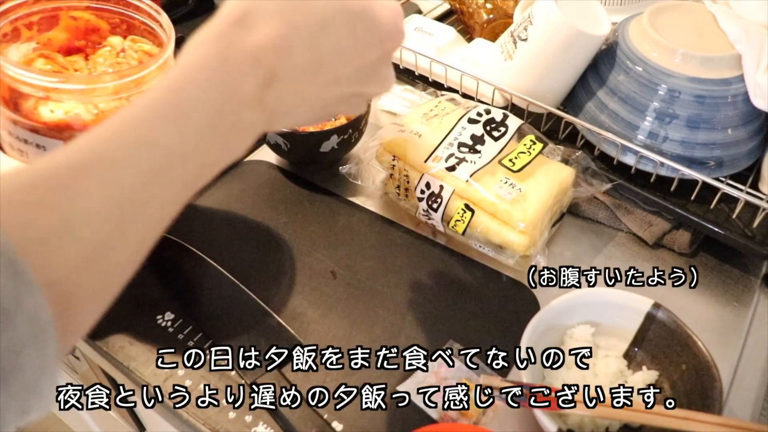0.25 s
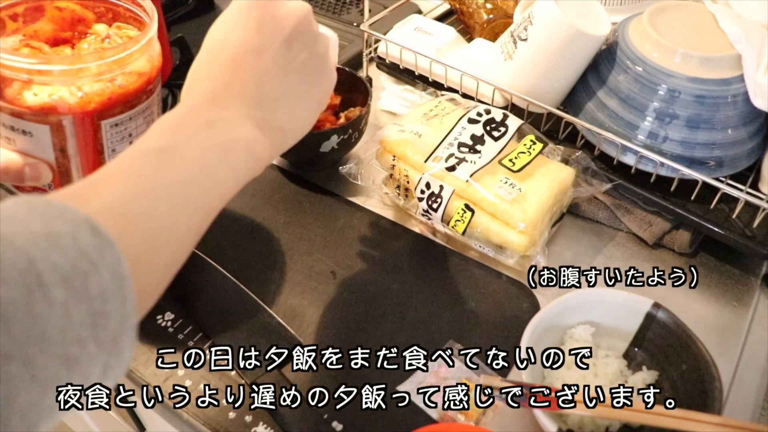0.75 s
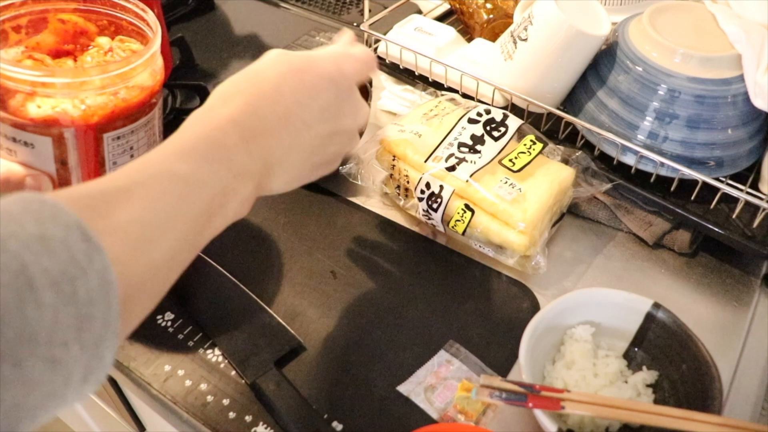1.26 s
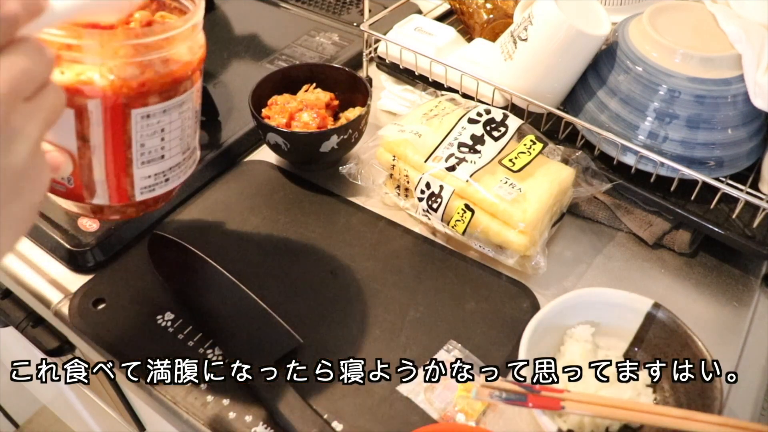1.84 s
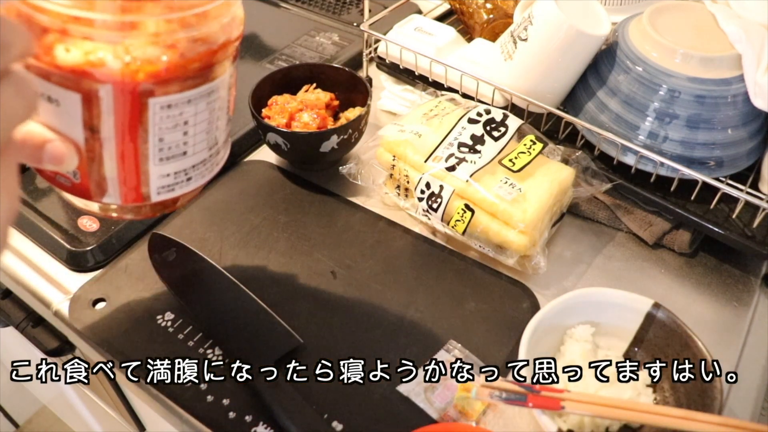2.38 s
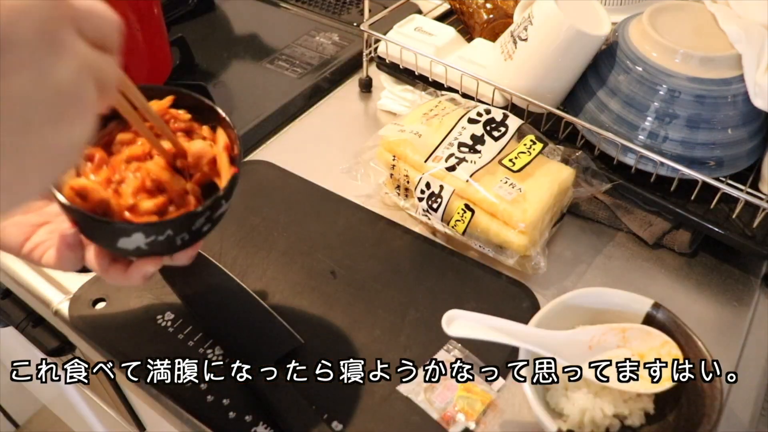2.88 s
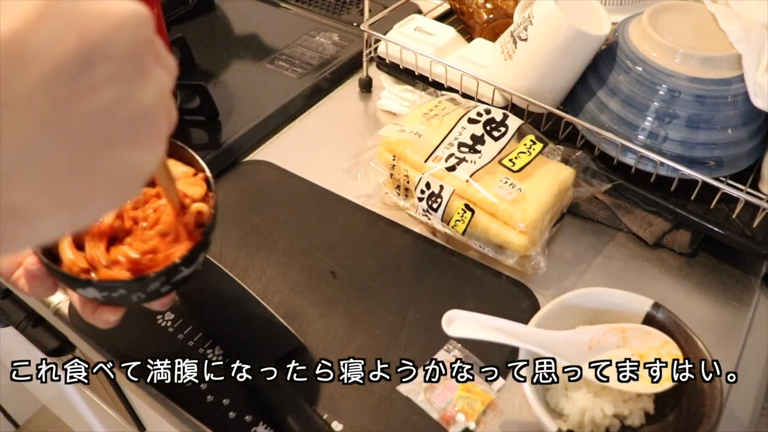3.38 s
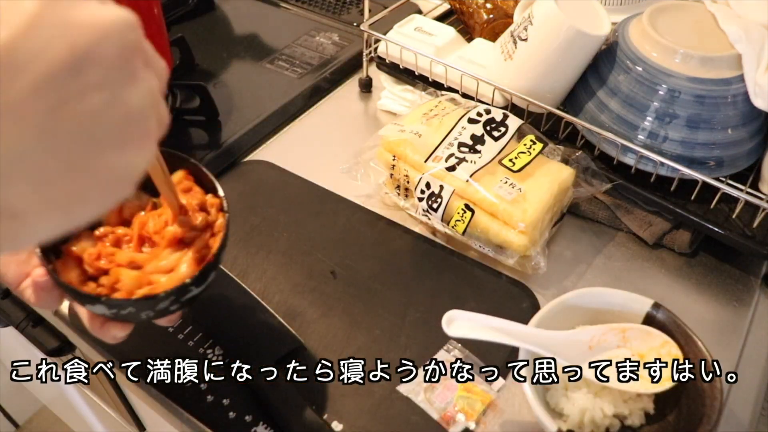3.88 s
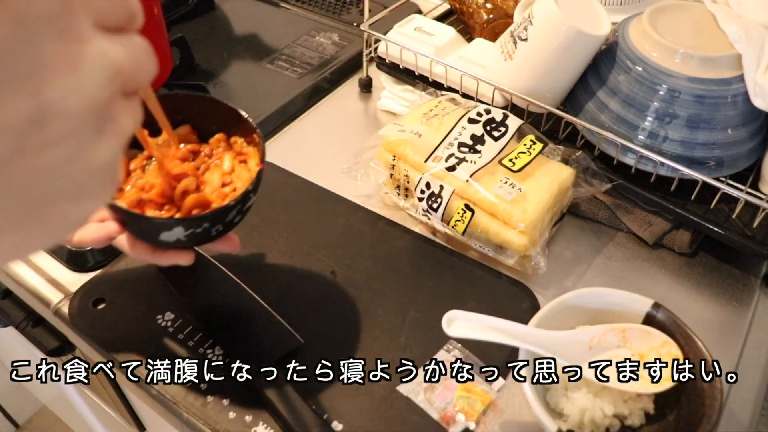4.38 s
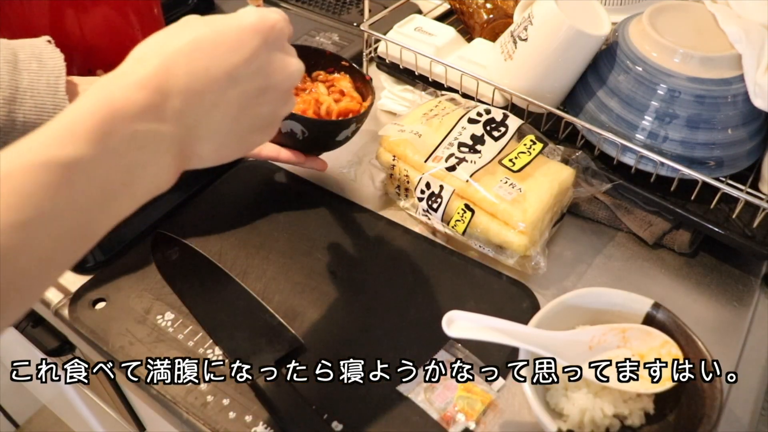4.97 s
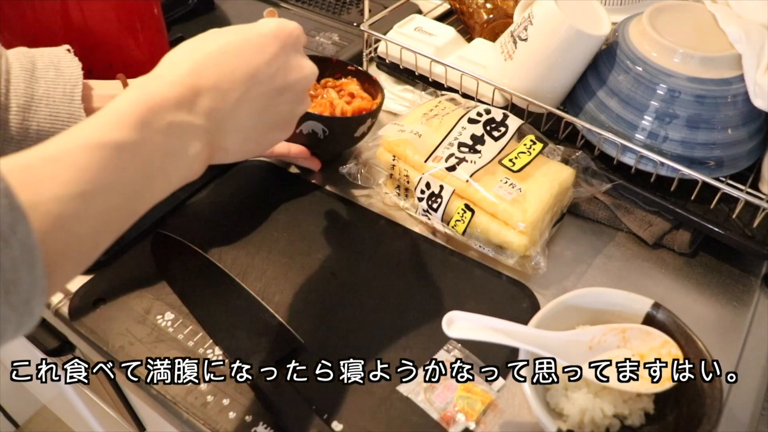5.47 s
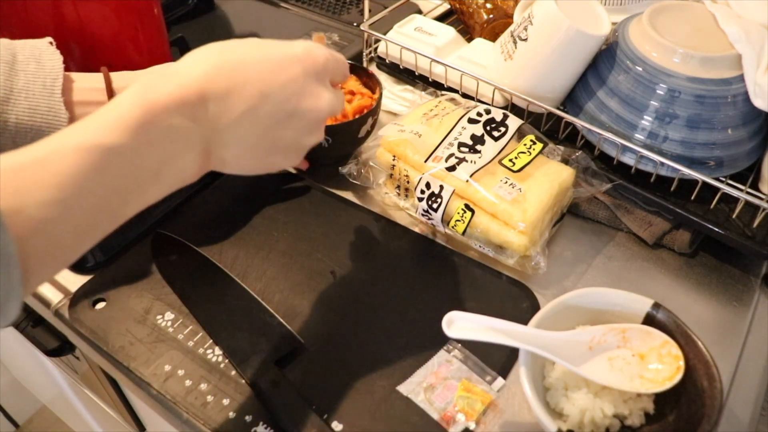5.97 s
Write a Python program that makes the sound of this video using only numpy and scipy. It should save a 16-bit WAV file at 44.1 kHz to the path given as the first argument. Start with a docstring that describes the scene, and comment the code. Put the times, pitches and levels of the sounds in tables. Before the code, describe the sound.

In a quiet kitchen, heard up close, faint chopstick ticks lead to four quick, hollow raps on the rim of a plastic jar. The chopsticks then scrape and click around a small bowl, with the crackle of wet food. As the stirring softens, something heavy slides, knocks loudly against a cabinet and bounces once. A refrigerator hums faintly underneath.

```python
"""A quiet kitchen, heard up close. Chopsticks rap four times on the rim of a plastic jar, each rap a
crack over a short hollow ring. They scrape and tick round a small bowl: stick-slip grit, a ringing
wall and the crackle of wet food. Something heavy slides, knocks home and bounces once, sounding
the cabinet. Underneath, a refrigerator hums in room rumble and microphone hiss."""
import sys
import numpy as np
from scipy import signal
from scipy.fft import rfft, irfft, next_fast_len
from scipy.io import wavfile
from scipy.ndimage import uniform_filter1d

SR = 44100
rng = np.random.default_rng(int(sys.argv[2]) if len(sys.argv) > 2 else 0)


def to_wav(s):
    """Save 16-bit WAV."""
    ch = np.atleast_2d(s).T  # columns
    pcm = np.round(np.clip(ch, -1, 1) * 32767)  # PCM
    wavfile.write(sys.argv[1], SR, pcm.astype(np.int16))


N = 274743

# Raps on the jar: start_s, level_db, hardness (0-1), pan_db (left minus right)
JAR_RAPS = [(1.885, -20.5, 0.87, -1.5), (2.0385, -19, 0.85, 0.5), (2.1763, -20.5, 0.65, 0),
            (2.315, -28.5, 0.46, 0)]
# The jar's hollow ring: pitch_hz, level_db, t60_s
JAR_MODES = [(218, -7.5, 0.086), (250, -2.5, 0.083), (319, -11, 0.042), (906, -2.5, 0.016),
             (1130, -16, 0.029), (1216, -7, 0.09), (1420, -28, 0.051), (1592, -16, 0.053),
             (1740, -33, 0.02), (2040, -13, 0.074), (2190, -11, 0.019), (2280, -3, 0.022), (3490, 1, 0.015)]
# Colour of the crack of wood on plastic: freq_hz, level_db
JAR_CRACK_EQ = [(100, -48), (160, -33), (225, -7.5), (300, -4), (430, -20), (750, -9.5), (1200, -4.5),
                (2100, -4.5), (2800, -8), (5000, -10), (9000, -13.5), (16000, -23.5)]
# Knocks of the heavy thing: start_s, level_db, hardness (0-1), pan_db (left minus right)
HEAVY_KNOCKS = [(5.393, -14, 0.9, 0), (5.3948, -4, 0.88, 1), (5.413, -21, 0.4, -1), (5.441, -46, 0.3, 0),
                (5.66, -14.5, 1, 1), (5.75, -35.5, 0.8, 2), (5.143, -44, 0, 2.5), (5.995, -40.5, 0.1, -0.5)]
# The cabinet's ring: pitch_hz, level_db, t60_s
CABINET_MODES = [(115.6, -1.5, 0.27), (214.4, -2, 0.29), (282, 0.5, 0.14), (326.7, -15, 0.23),
                 (393.2, -7.5, 0.18), (470, -14, 0.47), (492, -13.5, 0.042), (564, -12, 0.36),
                 (680, 9.5, 0.029), (728, -4, 0.13), (815, -12.5, 0.077), (848, 4.5, 0.097), (969, -6, 0.1),
                 (1077, -1, 0.084), (1305, -7, 0.041), (2754, -10, 0.054)]
# Colour of a knock's crack: freq_hz, level_db
CABINET_CRACK_EQ = [(88, -46.5), (150, -6), (291, 1), (534, -1.5), (689, -0.5), (1760, -10.5), (1900, -11),
                    (2810, -16), (3040, -16.5), (16000, -48)]
# Fader curve of the heavy thing rolling home: time_s, level_db
SLIDE_FADER = [(5.143, -53), (5.2, -84), (5.25, -51), (5.31, -50), (5.36, -59), (5.392, -73)]
# Chopstick ticks on bowl and food: start_s, level_db, pitch_hz, puff_t60_s
TIP_TICKS = [(0.044, -51, 3000, 0.026), (0.068, -45.5, 7800, .04), (0.711, -36.5, 13000, 0.012),
             (.7685, -45, 8200, 0.028), (.769, -41.5, 4600, 0.05), (0.774, -42, 4970, 0.076),
             (.829, -44.5, 9800, 0.047), (0.844, -45, 12000, 0.05), (1.043, -54, 6000, .03),
             (1.263, -52, 5500, .03), (1.412, -53, 6000, .02), (2.69, -48.5, 4000, .04),
             (2.779, -42.5, 680, 0.023), (2.811, -32, 4330, 0.065), (2.817, -40, 1640, 0.12),
             (2.972, -28, 1030, 0.039), (3.174, -40, 2660, 0.24), (3.238, -42.5, 2720, 0.11),
             (3.254, -37.5, 910, 0.11), (3.295, -31.5, 3020, 0.027), (3.366, -48, 4300, .03),
             (3.489, -31.5, 1030, 0.027), (3.496, -37, 5440, 0.14), (3.585, -37, 880, 0.027),
             (3.61, -37.5, 925, 0.13), (3.71, -39, 4100, 0.069), (3.7285, -26.5, 2500, 0.022),
             (3.734, -36, 1640, 0.065), (3.738, -34, 4500, 0.018), (3.84, -41, 9000, 0.01),
             (3.866, -39.5, 3040, 0.04), (3.883, -38.5, 3160, 0.08), (3.966, -45, 1130, 0.054),
             (4.609, -48.5, 3350, 0.091), (4.709, -36.5, 1050, 0.072), (4.712, -51, 2550, 0.24),
             (4.794, -44, 665, 0.043), (4.853, -46.5, 2660, 0.068), (5.997, -50, 5630, 0.27),
             (5.996, -48.5, 2430, 0.23)]
# Scraping strokes: start_s, rise_s, fall_s, hiss_db, ring_db, drag_db (last two relative to hiss_db)
SCRAPE_STROKES = [(0.04, 0.024, 0.018, -61, -10, -24), (0.8, .05, 0.027, -66, -20, -8),
                  (1.62, 0.053, 0.1, -61, -12, -19), (2.495, 0.014, 0.14, -65, -5, -29),
                  (2.7, .018, .022, -69, -16, -14), (2.77, 0.025, .02, -59.5, -4, -14),
                  (2.807, 0.016, 0.036, -46, -14, -20), (2.83, 0.072, 0.064, -45, -6, -16),
                  (2.971, 0.0035, 0.18, -47.5, -7.5, -13.5), (3.08, 0.066, 0.1, -46.5, -5.5, -8),
                  (3.23, 0.051, 0.057, -46, -1.5, -16), (3.35, 0.11, 0.03, -50, -8, -18),
                  (3.486, 0.012, 0.049, -45.5, -5.5, -11), (3.582, 0.0043, 0.04, -50.5, -2.5, -5.5),
                  (3.59, 0.032, 0.082, -47, -4, -18), (3.66, 0.026, 0.034, -50.5, -9, -26),
                  (3.73, 0.024, 0.018, -49.5, -5, -25), (3.83, 0.017, 0.067, -61.5, -2.5, -0.5),
                  (3.88, 0.011, 0.09, -53.5, -1.5, -11.5), (3.962, 0.01, 0.025, -51.5, -2, -7),
                  (4.05, 0.23, 0.052, -62, -1, -26), (4.28, 0.073, 0.095, -68.5, -4, -31),
                  (4.45, 0.19, .05, -63.5, -5, -15.5), (4.64, 0.044, 0.028, -58, -16, -26.5),
                  (4.71, 0.054, 0.086, -57, -6.5, -26), (4.81, .055, .06, -59.5, -4.5, -11),
                  (4.89, .055, 0.082, -63, -10, -13), (4.98, .06, 0.17, -68, -0.5, -5),
                  (5.134, 0.13, .12, -57, -2.5, 5.5), (5.25, 0.15, .05, -56, -17, -18.5),
                  (5.341, .3, 0.032, -57.5, -4.5, 2), (5.994, 0.029, 0.21, -64.5, -2, 1)]
# Bright hiss of the tips: freq_hz, level_db
TIP_HISS_EQ = [(3000, -43), (4500, -7.5), (6500, -0.5), (9000, 0), (12500, -1), (15000, -5.5), (16000, -9)]
# Resonances of the bowl wall: pitch_hz, width_hz, level_db
BOWL_MODES = [(1480, 83, 8), (1870, 67, 1), (2610, 280, 24), (3850, 590, 24.5), (5140, 280, 22.5)]
# Dull body of a scrape or slide: freq_hz, level_db
DRAG_EQ = [(120, -33.5), (200, -9), (560, -6.5), (800, -7.5), (1000, -2.5), (1350, -2), (1600, -6),
           (2000, -6), (2300, -16.5), (4000, -50.5)]
# The kitchen's decay: freq_hz, t60_s
ROOM_DECAY = [(100, 0.89), (300, 0.77), (1000, 0.41), (3000, 0.34), (9000, 0.27)]
# Refrigerator tones: pitch_hz, width_hz, level_db
FRIDGE_TONES = [(72.3, 11, -65), (117.3, 12, -66), (215, 18, -80), (329.4, 34, -79), (1199, 60, -78.5)]
# Room rumble and microphone hiss: freq_hz, level_db
ROOM_TONE_EQ = [(15, -40), (25, -29.5), (40, -2.5), (52, -17), (70, -8), (120, -2), (151, -18.5),
                (211, -11), (321, -16), (490, -21.5), (1000, -28.5), (1630, -30.5), (4360, -32),
                (15000, -32), (16300, -48.5)]
# Stereo image of the near sounds and their reverb: freq_hz, likeness (0 wide, 1 centred)
NEAR_IMAGE = [(60, 0.51), (400, 1), (950, 0.93), (2400, 0.34), (6000, 0.078), (15000, 0.11)]
# Stereo image of the background: freq_hz, likeness (0 wide, 1 centred)
BED_IMAGE = [(30, 1), (180, 0.99), (550, 0.88), (1650, 0.44), (5000, 0.093), (15000, .1)]
# Imbalance of the microphone ports: freq_hz, pan_db (left minus right)
PORT_BALANCE = [(60, 1), (600, 0.6), (1500, 0.5), (15000, 0.8)]

TICK_SPREAD, TICK_PAN_DB = 2.6, 1.5  # more spread gives a drier, less pitched tick
HISS_POWER, DRAG_POWER = 1.01, 0.8  # how steeply hiss and drag follow the speed of the tips
SIZZLE_HZ = 12870  # the bright top of a fast stroke
CRACKLES_PER_S, CRACKLE_DB, CRACKLE_SPREAD_DB, CRACKLE_T60_S = 180, -4, 4.5, 0.0068
ROOM_TONE_DB, HIGH_CUT_HZ = -60.5, 15850
RIGHT_LAG_SAMPLES = 4  # the sources stand a little to the left


def jar_raps():
    """Both chopsticks land on the rim, the second a softer flam a few ms after the first."""
    flams = [(s + .0065, db - 6, hardness, pan_db) for s, db, hardness, pan_db in JAR_RAPS]
    return blows(list(JAR_RAPS) + flams, JAR_MODES, JAR_CRACK_EQ,
                 crack_db=-0.5, crack_t60_s=0.058, contact_s=0.000064, room_db=-19.5, linger=1.0)


def heavy_knocks():
    """The heavy thing jolts, knocks home, rattles and bounces, ringing the cabinet."""
    return blows(HEAVY_KNOCKS, CABINET_MODES, CABINET_CRACK_EQ,
                 crack_db=-5.5, crack_t60_s=0.085, contact_s=0.00027, room_db=-16.0, linger=2.2)


def blows(cues, modes, crack_eq, crack_db, crack_t60_s, contact_s, room_db, linger):
    """Each blow layers ring, crack and room tail; a harder one speaks faster and cracks more."""
    out, t = np.zeros((2, N)), np.arange(SR // 2) / SR
    for start_s, level_db, hardness, pan_db in cues:
        spot_db = 2.46 * rng.standard_normal(len(modes))  # each blow lands a little elsewhere
        ring = sum((-1) ** k * gain_of(db + spot_db[k] - 60 * t / t60) * np.sin(2 * np.pi * hz * t)
                   for k, (hz, db, t60) in enumerate(modes))
        ring *= 1 - np.exp(-t * np.clip(hardness, .05, 2) / contact_s)
        ring /= abs(ring).max()
        crack = noise(len(t), lambda hz: eq(crack_eq, hz))
        crack *= gain_of(crack_db - 60 * t / crack_t60_s) * (1 - np.exp(-t / 0.00051))
        # the tail has the crack's colour, with the body's modes lingering in it
        wash = noise(len(t), lambda hz: eq(crack_eq, hz) * (1 + linger * hollow(hz, modes, width_hz=10)))
        blow = placed(ring, pan_db) + hardness * crack + gain_of(room_db) * room_tail(wash)
        add(out, start_s, gain_of(level_db) * blow)
    return out


def heavy_slide():
    """The heavy thing slides with a dull rasp that sets the cabinet's modes humming."""
    time_s, level_db = np.transpose(SLIDE_FADER)
    t = np.arange(time_s[0], time_s[-1], 1 / SR)
    rasp = noise(len(t), lambda hz: eq(DRAG_EQ, hz) * (1 + hollow(hz, CABINET_MODES, width_hz=40)))
    fader = gain_of(np.interp(t, time_s, level_db)) * signal.windows.tukey(len(t), .03)
    out = np.zeros((2, N))
    add(out, time_s[0], rasp * fader)
    return out


def chopstick_ticks():
    """A wooden tip touches down: one sharp click and a short puff round the same pitch."""
    out, t = np.zeros((2, N)), np.arange(8192) / SR
    for start_s, level_db, pitch_hz, t60_s in TIP_TICKS:
        width_hz = TICK_SPREAD * pitch_hz / np.sqrt(pitch_hz * t60_s)
        click = np.sin(2 * np.pi * pitch_hz * t) * np.exp(-np.pi * width_hz * t)
        puff = noise(len(t), lambda hz: peak(hz, pitch_hz, width_hz) ** 1.45 + 0.03)
        puff *= gain_of(-9.5 - 60 * t / t60_s) * (1 - np.exp(-t / 0.0008))
        add(out, start_s, gain_of(level_db) * (placed(click, pan_db=0) + puff) * pan(TICK_PAN_DB))
    return out


def bowl_scrapes():
    """Stick-slip grit roughens three layers: hissing tips, ringing bowl wall and dull drag."""
    hiss_level, ring_level, drag_level = stroke_levels()
    grit = unit_rms(gain_of(0.84 * unit_rms(uniform_filter1d(rng.standard_normal(N), size=60))))
    hiss = friction(lambda hz: eq(TIP_HISS_EQ, hz), depth_db=0.5)
    sizzle = friction(lambda hz: peak(hz, SIZZLE_HZ, 5600) ** 2, depth_db=3)
    ring = friction(lambda hz: sum(gain_of(db) * peak(hz, f, w) for f, w, db in BOWL_MODES), depth_db=4.5)
    drag = friction(lambda hz: eq(DRAG_EQ, hz), depth_db=6.5)
    # sizzle and crackle grow faster than the hiss, so hard strokes are brighter and wetter
    bite = (hiss_level / gain_of(-42.5)) ** 0.89
    tips = hiss + bite * (food_crackle() + sizzle)
    return grit * (hiss_level * tips + ring_level * ring + drag_level * drag)


def stroke_levels():
    """Hiss, ring and drag envelopes: strokes speed up and slow on quarter sines and add in power."""
    power = np.zeros((3, N))
    for start_s, rise_s, fall_s, hiss_db, ring_db, drag_db in SCRAPE_STROKES:
        t = np.arange(0, rise_s + fall_s, 1 / SR)
        quarter_turns = np.where(t < rise_s, t / rise_s, 1 + (t - rise_s) / fall_s)
        speed = abs(np.sin(np.pi / 2 * quarter_turns))
        shapes = np.array([speed ** HISS_POWER, speed ** HISS_POWER, speed ** DRAG_POWER])
        gains = gain_of([[hiss_db], [hiss_db + ring_db], [hiss_db + drag_db]])
        add(power, start_s, (shapes * gains) ** 2)
    return np.sqrt(power)


def friction(colour, depth_db):
    """Rubbing noise whose bands flicker in patches of some 40 ms as the point of contact wanders."""
    bands = signal.stft(noise(N, colour), nperseg=256)[2]
    patches = uniform_filter1d(rng.standard_normal(bands.shape[1:]), size=5, axis=0)
    patches = uniform_filter1d(patches, size=14, axis=1)
    bands *= gain_of(depth_db * unit_rms(patches))
    return unit_rms(signal.istft(bands, nperseg=256)[1][:, :N])


def food_crackle():
    """Wet food snaps under the tips: tiny bursts of uneven size, each a few ms of noise."""
    sizes = gain_of(CRACKLE_SPREAD_DB * np.minimum(rng.exponential(1, N), 4))
    triggers = rng.random(N) < CRACKLES_PER_S / SR
    decay = gain_of(-60 * np.arange(600) / SR / CRACKLE_T60_S)
    envelope = signal.oaconvolve(sizes * triggers, decay)[:N]
    return gain_of(CRACKLE_DB) * unit_rms(envelope * noise(N, lambda hz: peak(hz, 5000, 4000) ** 2))


def kitchen_reverb(send):
    """The room's diffuse answer to the small sounds."""
    impulse = room_tail(noise(SR // 2, np.ones_like))
    impulse /= np.linalg.norm(impulse[0])
    return signal.oaconvolve(send.mean(0)[None], impulse, axes=1)[:, :N]


def room_tail(wash):
    """Noise fades in as the first walls answer, then dies band by band, the bass last."""
    count = wash.shape[1]
    hz, t, bands = signal.stft(wash, SR, nperseg=256)
    bands *= gain_of(-60 * t / curve(ROOM_DECAY, hz)[:, None])
    fade_in = np.clip((np.arange(count) / SR - .002) / 0.0018, 0, 1)
    return fade_in * signal.istft(bands, SR, nperseg=256)[1][:, :count]


def fridge_hum():
    """The refrigerator's unsteady tones: narrow bands of noise, each drifting in level."""
    out, span = np.zeros((2, N)), round(.15 * SR)
    for pitch_hz, width_hz, level_db in FRIDGE_TONES:
        drift = uniform_filter1d(uniform_filter1d(rng.standard_normal(N), size=span), size=span)
        tone = noise(N, lambda hz: peak(hz, pitch_hz, width_hz) ** 2, BED_IMAGE)
        out += gain_of(level_db + 2.5 * unit_rms(drift)) * tone
    return out


def room_tone():
    """A steady bed of room rumble and microphone hiss."""
    return gain_of(ROOM_TONE_DB) * noise(N, lambda hz: eq(ROOM_TONE_EQ, hz), BED_IMAGE)


def noise(count, colour, image=NEAR_IMAGE):
    """Stereo noise of rms 1, shaped by the gain colour(hz) and as wide as the image table says."""
    size = next_fast_len(count)
    hz = np.fft.rfftfreq(size, 1 / SR)
    left, unrelated = rfft(rng.standard_normal((2, size)))
    likeness = np.clip(curve(image, hz), -1, 1)
    lag = np.exp(-2j * np.pi * hz * RIGHT_LAG_SAMPLES / SR)
    right = likeness * left * lag + np.sqrt(1 - likeness ** 2) * unrelated
    return unit_rms(irfft(np.array([left, right]) * colour(hz), size))[:, :count]


def peak(hz, centre_hz, width_hz):
    """Gain of one resonance."""
    return 1 / np.sqrt(1 + (2 * (hz - centre_hz) / width_hz) ** 2)


def hollow(hz, modes, width_hz):
    """Gain of all the modes of a body, each of equal height."""
    return sum(peak(hz, pitch_hz, width_hz) ** 2 for pitch_hz, _, _ in modes)


def curve(points, hz):
    """A table read on a log-frequency axis."""
    freq_hz, value = np.transpose(points)
    return np.interp(np.log(hz + 1), np.log(freq_hz + 1), value)


def eq(points, hz):
    """Gain of an EQ curve drawn in dB."""
    return gain_of(curve(points, hz))


def placed(mono, pan_db):
    """A mono sound panned, reaching the right microphone slightly late."""
    return np.array([mono, np.roll(mono, RIGHT_LAG_SAMPLES)]) * pan(pan_db)


def pan(pan_db):
    """Left and right gains, pan_db apart."""
    return gain_of([[pan_db / 2], [-pan_db / 2]])


def add(mix, start_s, sound):
    """Mixes a sound in at its cue."""
    part = mix[:, round(start_s * SR):][:, :sound.shape[1]]
    part += sound[:, :part.shape[1]]


def gain_of(db):
    """Decibels to a gain."""
    return 10 ** (np.asarray(db) / 20)


def unit_rms(x):
    """Scaled to rms 1."""
    return x / np.sqrt(np.mean(x ** 2) + 1e-20)


def scene():
    """The close action and its reverb over room tone and refrigerator."""
    ticks, scrapes = chopstick_ticks(), bowl_scrapes()
    near = jar_raps() + heavy_slide() + heavy_knocks() + ticks + scrapes
    near += kitchen_reverb(gain_of(-10.5) * ticks + gain_of(-4.5) * scrapes)
    low_cut = signal.butter(3, 75, "high", fs=SR, output="sos")  # small things radiate no deep bass
    return signal.sosfilt(low_cut, near) + room_tone() + fridge_hum()


def record(dry):
    """The left port hears a little louder; anything over full scale clips; then a steep high cut."""
    size = next_fast_len(N)
    tilt_db = curve(PORT_BALANCE, np.fft.rfftfreq(size, 1 / SR)) / 2
    ports = irfft(rfft(dry, size) * gain_of([tilt_db, -tilt_db]), size)[:, :N]
    high_cut = signal.firwin(511, HIGH_CUT_HZ, window=("kaiser", 9), fs=SR)
    return signal.oaconvolve(np.clip(ports, -1, 1), high_cut[None], "same")


dry = scene()
out = record(dry)
to_wav(out)
```